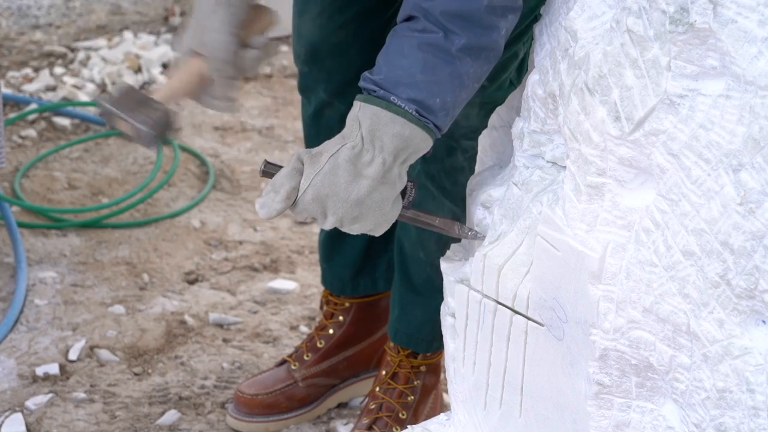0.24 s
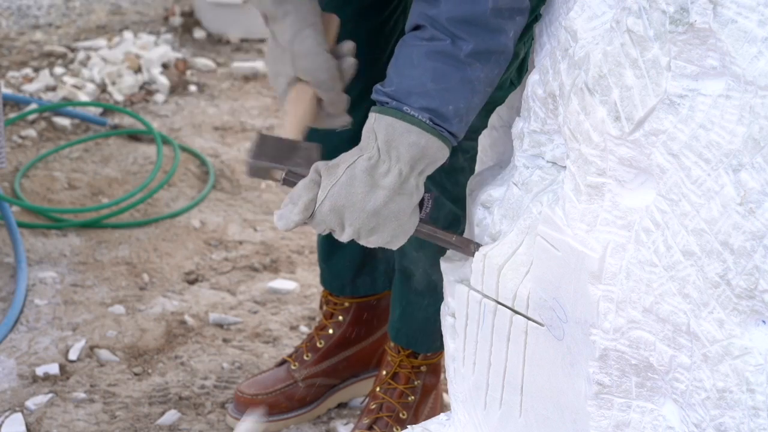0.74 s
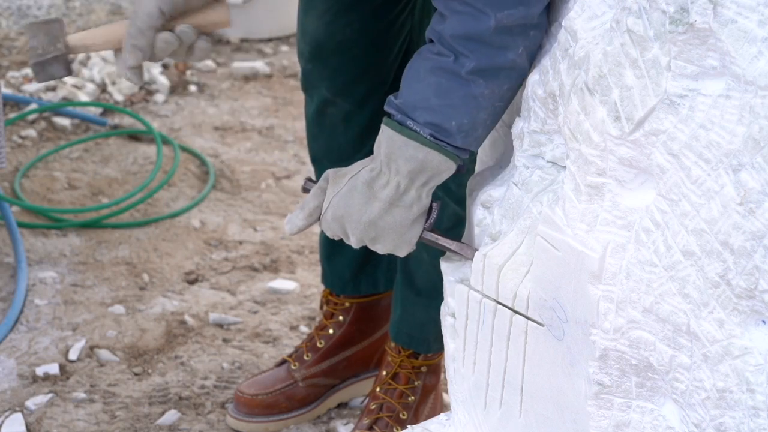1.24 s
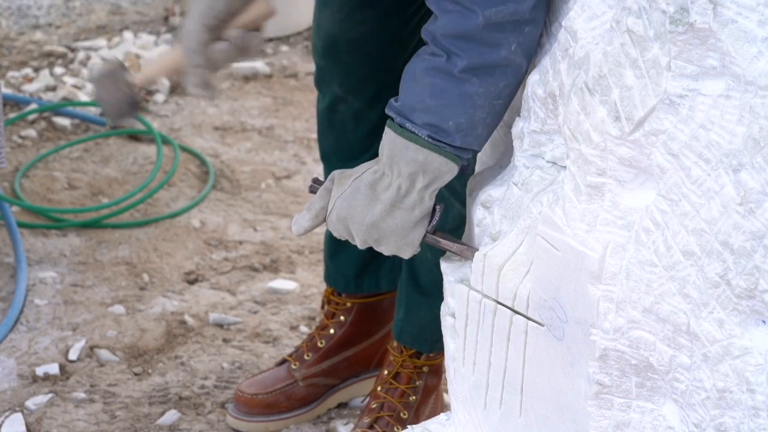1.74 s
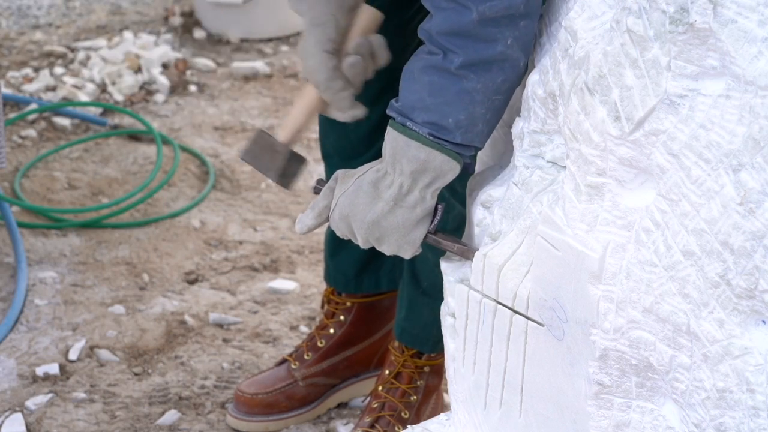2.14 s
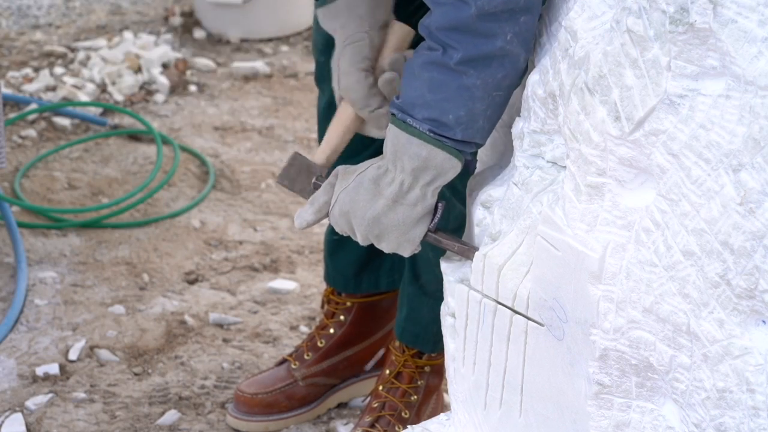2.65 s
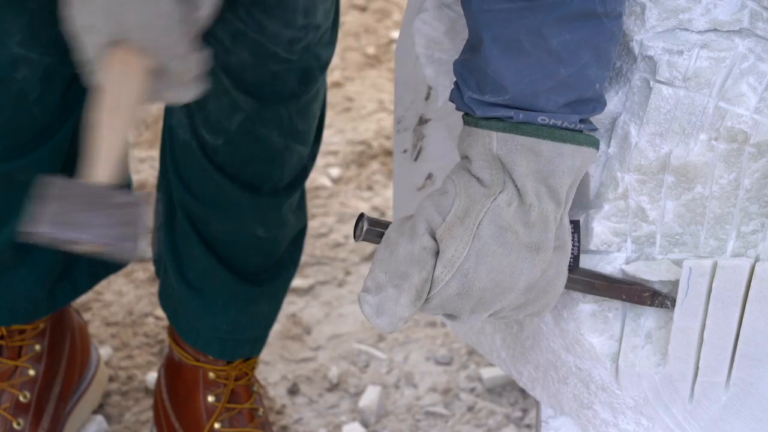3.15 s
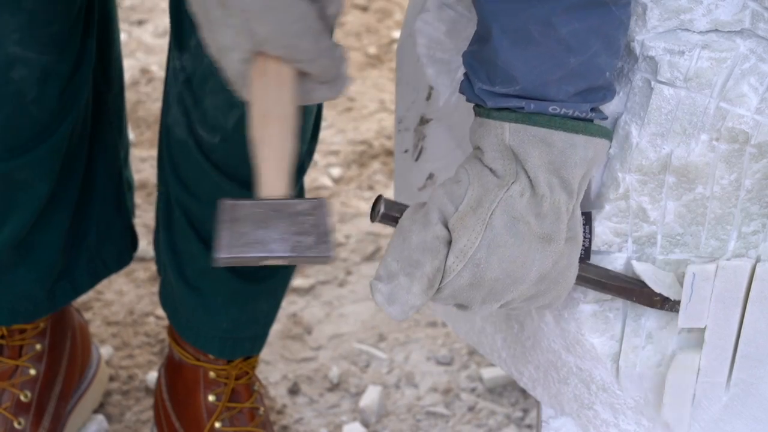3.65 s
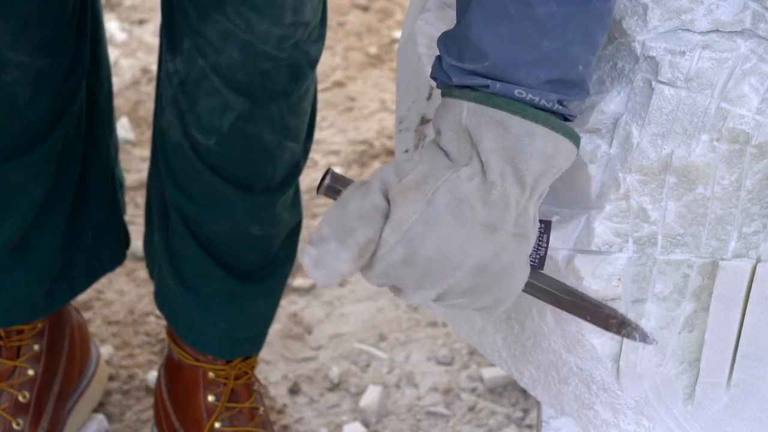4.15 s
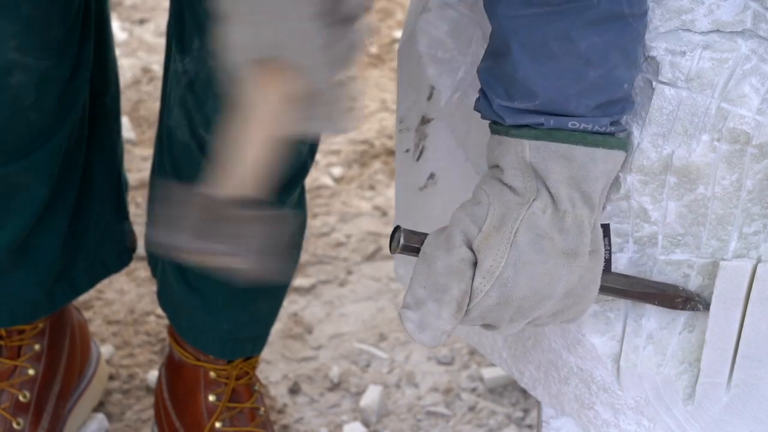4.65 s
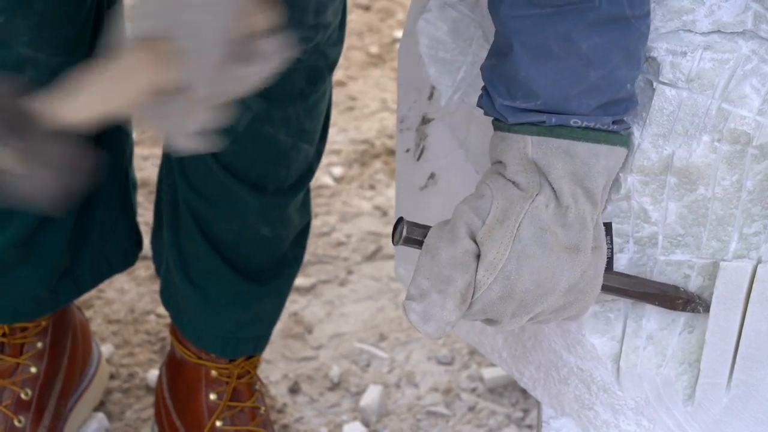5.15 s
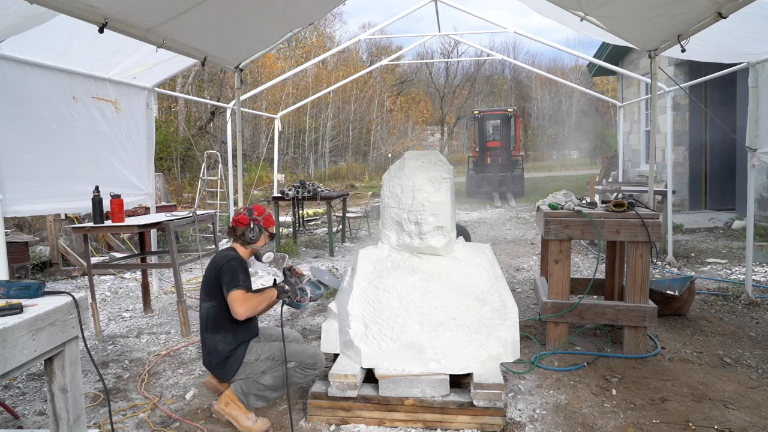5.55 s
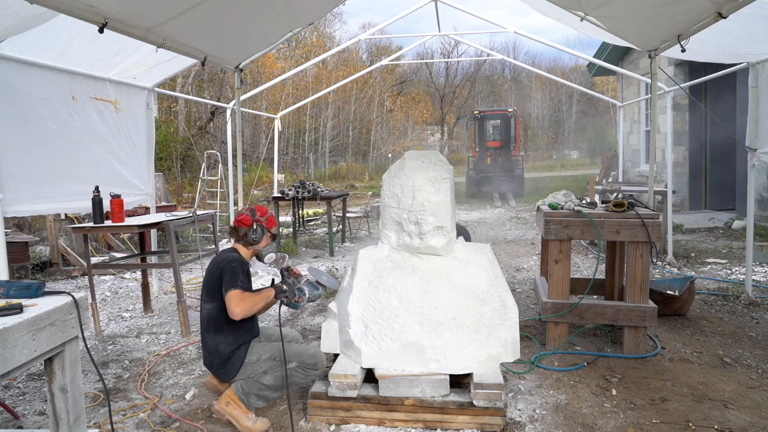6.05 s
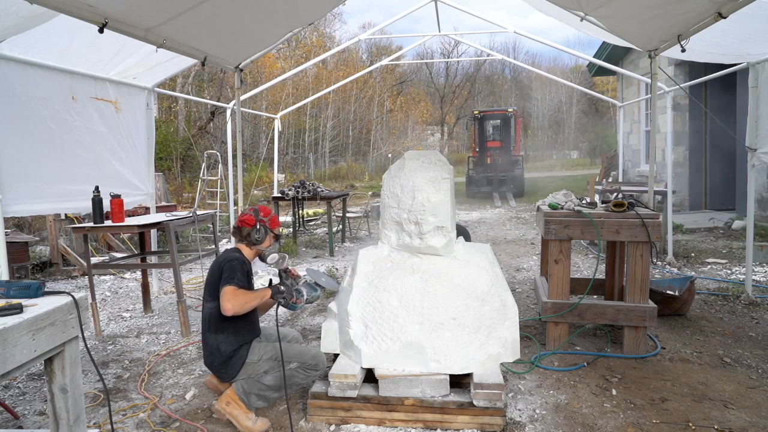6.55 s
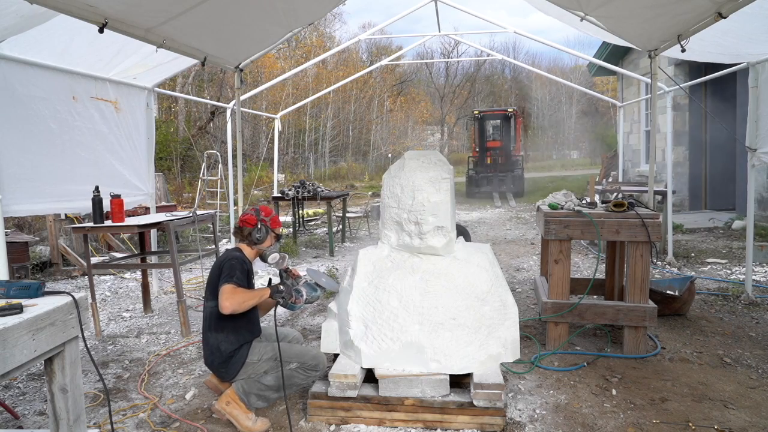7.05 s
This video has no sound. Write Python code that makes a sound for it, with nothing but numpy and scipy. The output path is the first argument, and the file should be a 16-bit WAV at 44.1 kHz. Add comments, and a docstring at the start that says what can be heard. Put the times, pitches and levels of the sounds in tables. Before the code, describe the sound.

Close outdoor stereo: a hammer strikes a steel chisel into marble in sharp, ringing blows with crunching stone and short yard reflections. Sleeves swish and chips knock on the dirt; a broken piece tumbles with bright clicks while wind bumps the microphone. After two more blows, it cuts abruptly to an angle grinder under a tent, hissing and rasping steadily, its motor whine rising for about a second under load.

```python
"""Hammer blows crack and ring on a steel chisel in a marble block, over the faint noise of a yard that answers them.
Each blow is crushing noise shaped by resonances of steel and stone. Broken stone knocks on the ground, chisel and
chips click, sleeves swish and wind bumps the microphone: all are bursts or swells of filtered noise.
Then the scene changes abruptly to an angle grinder under a tent: noise for the grit on marble, made to ring
like the disc, with sine tones for the motor, the spindle and a squeal."""
import sys
import numpy as np
from scipy import signal
from scipy.fft import rfft, irfft
from scipy.io import wavfile
from scipy.ndimage import uniform_filter1d

SR = 44100
rng = np.random.default_rng(int(sys.argv[2]) if len(sys.argv) > 2 else 0)


def to_wav(s):
    """Save 16-bit WAV."""
    ch = np.atleast_2d(s).T  # columns
    pcm = np.round(np.clip(ch, -1, 1) * 32767)  # PCM
    wavfile.write(sys.argv[1], SR, pcm.astype(np.int16))


N = 321930
TIME = np.arange(N) / SR
AFTER = np.arange(SR * 3 // 5) / SR  # seconds since a contact
BRIEF = np.arange(SR // 5) / SR  # the same, for small contacts

# In the tables, levels in dB are relative; a width in Hz is that of a resonance: narrow ones ring longer.
# A "t60" is the time a sound takes to fall by 60 dB.


def undb(db):
    """Turn decibels into gain."""
    return 10 ** (np.asarray(db) / 20)


def unit(x):
    """Scale to an rms of 1."""
    return x / np.sqrt(np.mean(x ** 2))


def freqs(x):
    """Frequencies in the spectrum of x, in Hz, kept at 1 or above."""
    return np.maximum(np.fft.rfftfreq(x.shape[-1], 1 / SR), 1)


def slope(f, points):
    """Gain drawn by straight lines between (pitch_hz, level_db) points, on a log pitch scale."""
    hz, db = np.transpose(points)
    return undb(np.interp(np.log(f), np.log(hz), db))


def peaks(f, modes):
    """Summed power response of (pitch_hz, width_hz, level_db) resonances."""
    return sum(undb(db) ** 2 / (1 + ((f * f - hz * hz) / (f * width)) ** 2) for hz, width, db in modes)


def hump(f, hz, octaves):
    """Gain of one broad resonance centred at hz."""
    return 1 / (1 + (np.log2(f / hz) / octaves) ** 4) ** .75


def shape(x, gain):
    """Filter with the given gain so that resonances ring after their cause, not before it."""
    size = x.shape[-1]
    # folding the cepstrum forward in time gives the minimum-phase filter
    cepstrum = irfft(np.log(gain + 1e-7), size)
    cepstrum[1:size // 2] *= 2
    cepstrum[size // 2 + 1:] = 0
    return irfft(rfft(x) * np.exp(rfft(cepstrum)), size)


def air(size, apart_hz):
    """Stereo noise, alike in both ears well below apart_hz and unrelated well above."""
    mid, side = rng.standard_normal((2, size))
    alike = 1 / (1 + (freqs(mid) / apart_hz) ** 2)
    mid = rfft(mid) * np.sqrt((1 + alike) / 2)
    side = rfft(side) * np.sqrt((1 - alike) / 2)
    return irfft(np.array([mid + side, mid - side]), size)


def walk(rate):
    """Smooth random drift of rms 1, taking rate steps a second."""
    size = int(SR / rate)
    steps = np.repeat(rng.standard_normal(N // size + 1), size)
    return unit(uniform_filter1d(steps, size)[:N])


def pan(db):
    """Channel gains for a left-minus-right level in dB."""
    return undb(np.array([[db], [-db]]) / 2)


def fade(t, t60):
    """Decay by 60 dB in t60 seconds."""
    return np.exp(-np.log(1000) * t / t60)


def add(out, s, x):
    """Mix x into out from time s."""
    start = int(s * SR)
    out[:, start:start + x.shape[1]] += x[:, :N - start]


def swells(rows, rest_db):
    """Gain of bell-shaped swells (middle_s, half_power_length_s, level_db) over a resting level."""
    power = sum(undb(db) ** 2 * .5 ** ((2 * (TIME - s) / length) ** 2) for s, length, db in rows)
    return np.sqrt(undb(rest_db) ** 2 + power)


def ramp(s, length):
    """A straight rise from 0 to 1 centred on time s."""
    return np.clip((TIME - s) / length + .5, 0, 1)


def impact(t, contact_s, near_db, near_t60, yard_db, yard_t60):
    """A contact crunch, quick reflections off block and ground, then the diffuse yard."""
    crunch = rng.standard_normal(len(t)) * fade(t, contact_s)
    # level out the broad tone colour, so each material can give its own
    power = uniform_filter1d(abs(rfft(crunch)) ** 2, size=len(t) // 80)
    crunch = shape(crunch, 1 / np.sqrt(power))
    near = undb(near_db) * air(len(t), apart_hz=2160) * fade(t, near_t60)
    yard = undb(yard_db) * air(len(t), apart_hz=1000) * fade(t, yard_t60) * (1 - fade(t, 0.012))
    return crunch + near + yard


# tone colour of the distant yard: pitch_hz, level_db
YARD_COLOUR = [(41, -9), (70, -9.5), (126, -2.5), (268, -9), (834, -7.5), (1250, -17.5), (1980, -31),
               (3650, -45), (4690, -45), (5020, -22), (6450, -32), (12200, -31), (16000, -28)]
# a low drone from far across the yard: pitch_hz, width_hz, level_db (rms)
FAR_DRONE = (112.8, 4.1, -58)


def distant_yard():
    """Distant noise of the yard drifts in level over a low drone, which is noise in a narrow band."""
    f = freqs(TIME)
    level_db = -51 + 1.3 * walk(6)
    yard = unit(shape(air(N, apart_hz=1030), slope(f, YARD_COLOUR))) * undb(level_db)
    hz, width, db = FAR_DRONE
    drone = unit(shape(air(N, apart_hz=720), peaks(f, [(hz, width, 0)]) ** 0.6)) * undb(db)
    return yard + drone


# tone colour of rubbing cloth: pitch_hz, level_db
CLOTH_COLOUR = [(530, -28.5), (900, -5.5), (1620, -5), (1770, -6.5), (2790, -8), (3770, -9.5),
                (8980, -12.5), (16000, -21.5)]
# swishes as the arm swings or shifts the chisel: middle_s, half_power_length_s, level_db
SLEEVE_SWISHES = [(.57, 0.14, -57), (1.32, .22, -44.5), (1.94, 0.2, -47.5), (2.42, 0.12, -49.5),
                  (3.37, 0.09, -45.5), (3.79, 0.35, -42.5), (4.76, 0.23, -43.5), (5.27, 0.34, -52.5)]


def sleeves():
    """Cloth rubs with a flickering level, softly between swings and louder as the arm moves."""
    cloth = unit(shape(air(N, apart_hz=1130), slope(freqs(TIME), CLOTH_COLOUR)))
    flicker = undb(1.1 * walk(70))
    return cloth * swells(SLEEVE_SWISHES, rest_db=-52.5) * flicker * pan(-1.8)


# tone colour of wind on the microphone: pitch_hz, level_db
WIND_COLOUR = [(12, -45), (20, -17), (64, 4.5), (103, -3.5), (175, -8), (307, -26), (400, -31), (520, -43),
               (880, -120)]
# gusts: middle_s, half_power_length_s, level_db
WIND_GUSTS = [(3.11, 0.04, -48), (3.5, 0.11, -54), (3.76, 0.078, -48), (4.09, 0.12, -45),
              (4.265, 0.078, -35), (4.675, 0.046, -33.5), (4.88, 0.11, -34.5), (4.97, 0.057, -34)]


def wind():
    """Gusts press on the microphone as low swells of noise over a faint breeze."""
    buffet = unit(shape(air(N, apart_hz=224), slope(freqs(TIME), WIND_COLOUR)))
    return buffet * swells(WIND_GUSTS, rest_db=-65)


# hammer blows: start_s, crack_db, clank_db, low_ping_db, bright_ring_db, high_ring_db, block_thud_db, yard_t60_s
HAMMER_BLOWS = [(0.0774, 3.5, -8, 4.5, 1.5, 3.5, 8, 0.22), (0.6109, 2, -2, 2.5, 6.5, -18, -19, 0.32),
                (1.4984, -0.5, 2, -6, -1, -7.5, -27, 0.31), (2.043, 0, 1.5, -6.5, -24, -1, -28, .35),
                (2.6051, -0.5, 2.5, -5, -3, -5, -9.5, .35), (3.5501, -0.5, -1, -4.5, -2, 1, 1, 0.3),
                (4.7275, -0.5, -2, -14, -1.5, 3, -15, 0.25), (5.2710, -2, 0.5, -6, -12, -6, -5.5, 0.36)]
# tone colour of marble crushed under the edge: pitch_hz, level_db
MARBLE_CRACK = [(100, -46), (300, -14.5), (600, -14), (1050, -1.5), (2000, 1.5), (3100, -1), (4700, 0),
                (7500, 0), (9600, -11), (12000, -10.5), (13500, -13), (16000, -13)]
# resonances of hammer, chisel and block, in five groups: pitch_hz, width_hz, level_db
STEEL_CLANK = [(2275, 82, 7), (2408, 130, 14), (2490, 12, 10), (5760, 450, 1.5), (5710, 120, 12.5),
               (7040, 210, -15), (8400, 160, 1), (9500, 350, -4)]
LOW_PING = [(3710, 41, 17.3)]
BRIGHT_RING = [(6887, 56, 16.2), (7500, 220, 4.5), (10800, 100, 0.5)]  # the steel bends
HIGH_STEEL_RING = [(11580, 120, 11), (12100, 400, -3), (14180, 60, -2), (15120, 110, 2)]
BLOCK_THUD = [(643, 91, 2.6)]


def hammer_blows():
    """Each blow crushes stone and rings the same steel; the chisel's seat decides which resonances speak."""
    out, f = np.zeros((2, N)), freqs(AFTER)
    groups = STEEL_CLANK, LOW_PING, BRIGHT_RING, HIGH_STEEL_RING, BLOCK_THUD
    for s, crack_db, *group_dbs, t60 in HAMMER_BLOWS:
        hit = impact(AFTER, contact_s=0.015, near_db=-21, near_t60=0.088, yard_db=-25, yard_t60=t60)
        # distant walls and trees send back a late, dull echo
        dull = shape(air(len(AFTER), apart_hz=900), 1 / (1 + (f / 5000) ** 2))
        echo = undb(-37) * dull * fade(AFTER, 0.68) * (1 - fade(AFTER, 0.4))
        crack = (undb(crack_db) * slope(f, MARBLE_CRACK)) ** 2
        ring = sum(undb(db) ** 2 * peaks(f, modes) for modes, db in zip(groups, group_dbs))
        add(out, s, undb(5.5) * shape(hit + echo, np.sqrt(crack + ring)) * pan(-1.2))
    return out


# stone dropping on dirt and rubble: start_s, level_db, centre_hz, near_t60_s (quick reflections)
STONE_KNOCKS = [(0.514, -12, 804, 0.062), (0.541, -6.5, 1060, 0.03), (0.944, 1.5, 870, 0.042),
                (1.135, -6.5, 800, 0.037), (3.854, -2.5, 1600, 0.037), (4.016, 9.5, 1490, 0.069),
                (4.047, 11, 685, 0.096), (4.095, 2.5, 760, 0.074), (4.211, -0.5, 1040, 0.12),
                (4.26, -6, 1390, 0.064), (4.445, -3.5, 1140, 0.11), (4.603, -4, 710, 0.1)]
# resonances of the broken-off piece: pitch_hz, width_hz, level_db
PIECE_MODES = [(658, 37, 6), (1110, 16, 3.5), (1386, 88, 0), (1870, 110, -6.5)]


def falling_stone():
    """Falling stone knocks dully on the ground and rings with the resonances of the broken piece."""
    out, f = np.zeros((2, N)), freqs(BRIEF)
    body = np.sqrt(undb(-4) ** 2 + peaks(f, PIECE_MODES))
    for s, db, hz, t60 in STONE_KNOCKS:
        knock = impact(BRIEF, contact_s=0.01, near_db=-16.5, near_t60=t60, yard_db=-34, yard_t60=0.5)
        add(out, s, undb(db - 1.5) * shape(knock, body * hump(f, hz, octaves=0.88)))
    return out


# chisel tip and chips on marble: start_s, level_db, centre_hz, spread_octaves, rebound_db (above the first touch)
BRIGHT_CLICKS = [(0.572, -13.5, 2400, 1.4, -15), (3.784, -5.5, 2120, 1.65, -10),
                 (3.816, -10, 2170, 1.7, -2), (4.131, -0.5, 1940, 0.88, -19), (4.14, -2.5, 2120, 1.96, 2),
                 (4.307, 4, 2190, 1.3, -8), (4.329, 13, 2560, 0.72, -1), (4.3352, 7.5, 2700, 1.76, -15),
                 (4.4076, 6.5, 3630, 0.85, -1.5), (4.597, -11.5, 3300, 1.54, 7.5),
                 (4.640, -6, 2520, 1.2, -5)]


def chisel_and_chip_clicks():
    """Steel and chips click brightly on the block, then rebound and touch again at a higher pitch."""
    out, f = np.zeros((2, N)), freqs(BRIEF)
    for s, db, hz, octaves, rebound_db in BRIGHT_CLICKS:
        touches = (0, 0, 1), (0.0073, rebound_db, 1.2)  # delay_s, level_db, pitch ratio
        for late_s, touch_db, brighter in touches:
            tick = impact(BRIEF, contact_s=0.0037, near_db=-12, near_t60=0.023, yard_db=-27, yard_t60=0.22)
            click = shape(tick, hump(f, hz * brighter, octaves))
            add(out, s + late_s, undb(db + touch_db - 7.5) * click * pan(-2))
    return out


# light touches of steel on steel: start_s, level_db
STEEL_TOUCHES = [(1.112, -21), (1.13, -29)]


def steel_touches():
    """A light touch of steel on steel excites only the low ping and the bright ring."""
    out, f = np.zeros((2, N)), freqs(AFTER)
    ring = np.sqrt(peaks(f, LOW_PING) + 0.32 * peaks(f, BRIGHT_RING))
    for s, db in STEEL_TOUCHES:
        touch = impact(AFTER, contact_s=0.023, near_db=-14, near_t60=0.16, yard_db=-40, yard_t60=.3)
        add(out, s, undb(db) * shape(touch, ring))
    return out


# one sleeve swish has a fuller middle band as the arm swings: middle_s, half_power_length_s, level_db
SLEEVE_RUB = (1.312, 0.087, -44.5)


def sleeve_rub():
    """The sleeve's swish has a fuller middle band as the arm swings: a short swell of band-limited noise."""
    rub = unit(shape(air(N, apart_hz=1150), hump(freqs(TIME), hz=2250, octaves=0.64)))
    return rub * swells([SLEEVE_RUB], rest_db=-80) * pan(-1.8)


# a blow heard only as its wash in the yard: start_s, level_db, yard_t60_s
YARD_WASH = (3.017, -22.5, 0.77)


def yard_wash():
    """One blow is heard only as fading noise coloured by the crack and the clank."""
    out, f = np.zeros((2, N)), freqs(AFTER)
    s, db, t60 = YARD_WASH
    wash = air(len(AFTER), apart_hz=960) * fade(AFTER, t60)
    colour = np.sqrt(slope(f, MARBLE_CRACK) ** 2 + 0.21 * peaks(f, STEEL_CLANK))
    add(out, s, undb(db - 11) * shape(wash, colour))
    return out


def lean_and_release():
    """The carver leans on the grinder once: how hard from 0 to 1, and the motor angle as it races on release."""
    lean_s, release_s, ramp_s = 6.03, 6.95, .08
    released = ramp(release_s, ramp_s)
    lean = ramp(lean_s, ramp_s) - released
    race_hz = 27.7 * released * np.exp(-abs(TIME - release_s) / .2)
    motor_hz = 861 + race_hz
    motor = 2 * np.pi * np.cumsum(motor_hz * (1 + 0.0011 * walk(25))) / SR
    return lean, motor


def tent(x, echo_db, t60, sway):
    """Block, ground and canvas comb the sound finely; the pattern shifts as the tool travels (sway in rad/s)."""
    t = np.arange(SR // 5) / SR
    places = undb(echo_db) * air(2 * len(t), apart_hz=1500).reshape(2, 2, -1)
    places = places * fade(t, t60) * (1 - fade(t, 0.041))
    first, second = (signal.fftconvolve(x, places[:, k], axes=1)[:, :N] for k in range(2))
    return unit(x + first * np.cos(sway * TIME) + second * np.sin(sway * TIME))


# tone colour of grit tearing at marble: pitch_hz, level_db
GRIT_COLOUR = [(24, -57), (40, -24), (158, -32), (208, -32), (463, -23), (802, -17), (865, -5.5),
               (980, -15.5), (1830, -9), (1970, -9.5), (2410, -3.5), (2870, -6), (5780, -5), (6390, -5),
               (15700, -8)]
# ringing of the disc and its guard: pitch_hz, width_hz, level_db
DISC_MODES = [(3500, 70, 2), (3900, 120, -2), (4620, 130, 2), (4820, 130, 4), (5130, 90, 1), (5410, 110, 8),
              (6175, 60, 12), (6370, 70, 6), (6650, 130, 7), (7300, 90, 8), (7510, 50, 10), (7870, 70, 7),
              (8310, 60, 4), (8450, 60, 4), (8675, 110, 9), (9065, 90, 6), (9600, 130, 4), (9900, 60, 3),
              (10300, 50, 5), (10620, 80, 2), (10810, 60, 5), (11270, 220, 5), (12430, 80, 4),
              (12900, 120, 2), (13510, 70, 6), (14060, 80, 4), (14400, 100, 1), (14950, 90, 2),
              (15240, 140, 5), (15700, 80, 6)]
# hollows between the resonances: pitch_hz, width_hz, strength_db
DISC_HOLLOWS = [(1270, 110, 7), (1950, 90, 8), (4060, 69, -1), (5770, 160, 1.5), (6770, 150, 5),
                (11660, 230, 1), (14680, 100, 4)]
# bands of the rasp: pitch_hz, width_hz, level_db
RASP_BANDS = [(1977, 95, -5.5), (2112, 57, -13), (2450, 20, 6), (2600, 170, -14)]


def grit_on_marble(spindle, lean):
    """Grit tears at the marble: it hisses through the ringing disc and rasps in narrow bands."""
    f = freqs(TIME)
    # the disc bites harder once a turn and chatters unevenly
    bite = (1 + 0.078 * np.sin(spindle)) * undb(1.1 * walk(45) + walk(1500))
    grit = tent(air(N, apart_hz=3000) * bite, echo_db=-23, t60=.12, sway=3.2)
    ringing = np.sqrt(undb(-4) ** 2 + peaks(f, DISC_MODES))
    ringing = np.where(f > 3000, ringing, undb(-5))
    colour = slope(f, GRIT_COLOUR) * ringing / np.sqrt(1 + peaks(f, DISC_HOLLOWS))
    hiss = unit(shape(grit, colour)) * undb(-32.5) * pan(-1.3)
    # the rasp has little below 1500 Hz and eases while the carver leans
    rasp_colour = np.sqrt(peaks(f, RASP_BANDS)) / (1 + (1500 / f) ** 6)
    rasp = unit(shape(grit, rasp_colour)) * undb(-49.5 - 1.5 * lean)
    return hiss + rasp


def motor_song(motor, lean):
    """The motor sings at its turning rate and whistles on its fifth harmonic, louder while leaned on."""
    level_db = -65.5 + 11.5 * lean
    whine = undb(level_db + 1.7 * walk(70)) * np.sin(motor)
    whistle = undb(level_db + 3.5 + 2 * walk(16)) * np.sin(5 * motor)
    return whine + whistle


# spindle tones: multiple (of the spindle rate), level_db (rms)
SPINDLE_TONES = [(1, -77), (3, -75.5), (5, -81), (6, -76)]


def spindle_hum(spindle):
    """The spindle hums on multiples of its turning rate."""
    return np.sqrt(2) * sum(undb(db) * np.sin(round(k) * spindle) for k, db in SPINDLE_TONES)


# the disc squeals loudest as it first digs in: middle_s, half_power_length_s, level_db
DISC_SQUEAL = (6.18, 0.14, -40)


def disc_squeal():
    """A wavering sine squeals softly throughout and swells as the disc digs in."""
    pitch_hz = 4535 + 6 * walk(40)
    tone = np.sin(2 * np.pi * np.cumsum(pitch_hz) / SR)
    return tone * swells([DISC_SQUEAL], rest_db=-50.5) * undb(2 * walk(25))


def grinder():
    """One motor angle drives the whine and, geared down, the spindle and the bite of the disc."""
    lean, motor = lean_and_release()
    spindle = motor * 157 / 861  # 157 turns of the spindle to 861 of the motor
    return grit_on_marble(spindle, lean) + motor_song(motor, lean) + spindle_hum(spindle) + disc_squeal()


def scene():
    """Chiselling in the yard, then at once the grinder."""
    surroundings = distant_yard() + sleeves() + wind() + sleeve_rub()
    steel = hammer_blows() + steel_touches() + yard_wash()
    chiselling = surroundings + steel + falling_stone() + chisel_and_chip_clicks()
    change_s = 5.2843
    return np.where(TIME < change_s, chiselling, grinder())


def record(dry):
    """The recorder rounds the highest peaks and cuts the treble above 15780 Hz."""
    rounded = np.tanh(1.1 * dry) / 1.1
    low_pass = signal.ellip(10, .2, 70, 15780, fs=SR, output="sos")
    return signal.sosfilt(low_pass, rounded)


dry = scene()
out = record(dry)
to_wav(out)
```